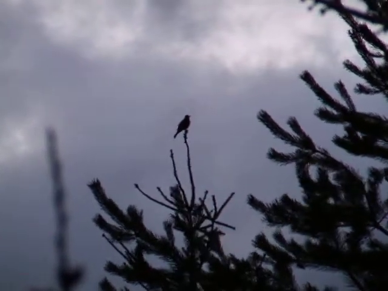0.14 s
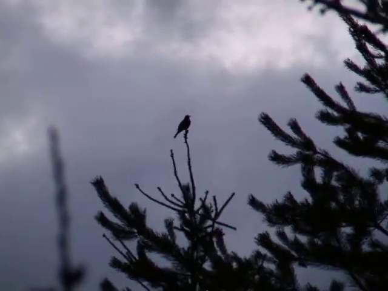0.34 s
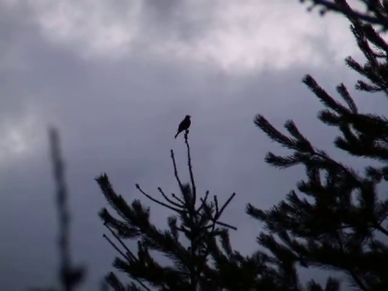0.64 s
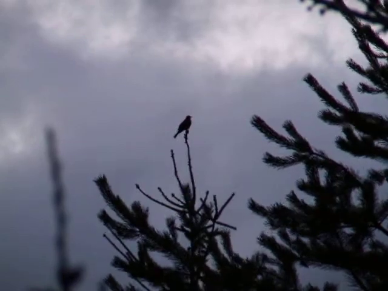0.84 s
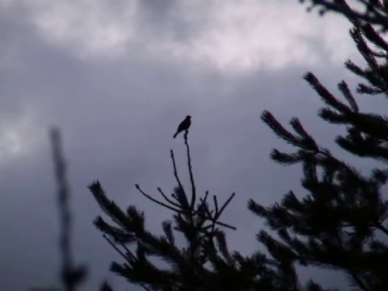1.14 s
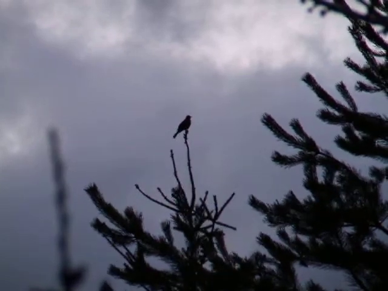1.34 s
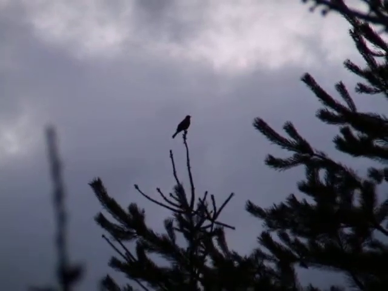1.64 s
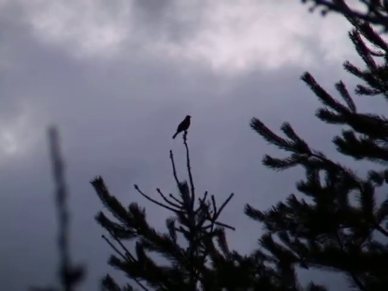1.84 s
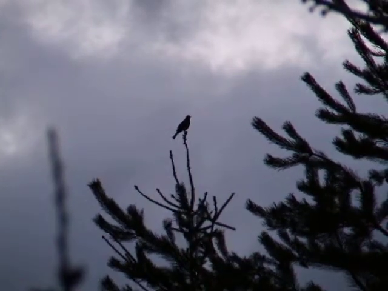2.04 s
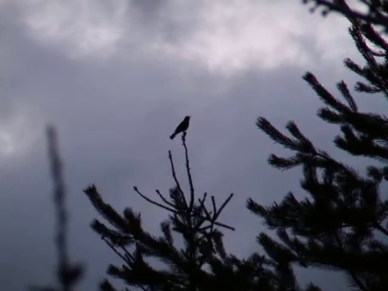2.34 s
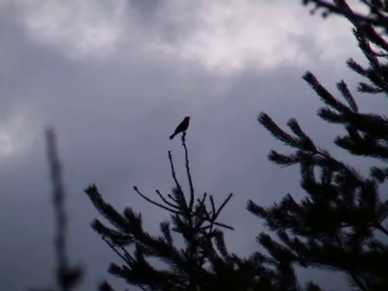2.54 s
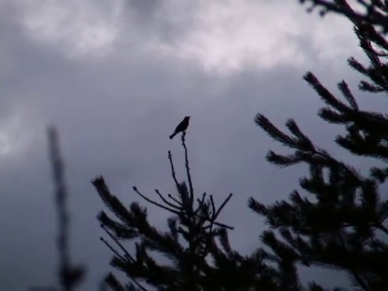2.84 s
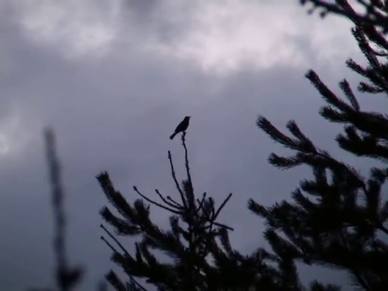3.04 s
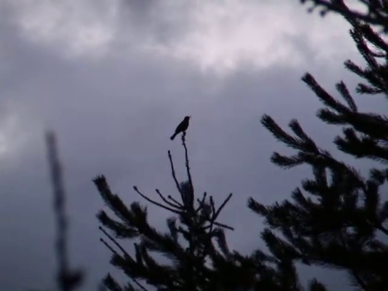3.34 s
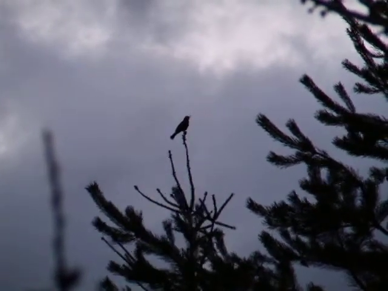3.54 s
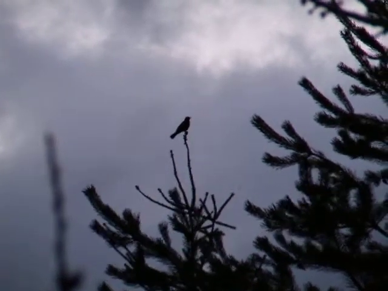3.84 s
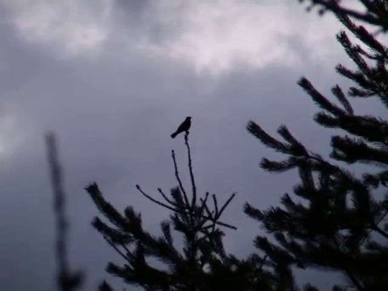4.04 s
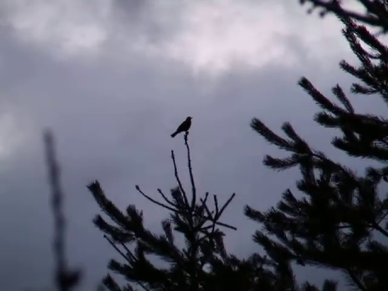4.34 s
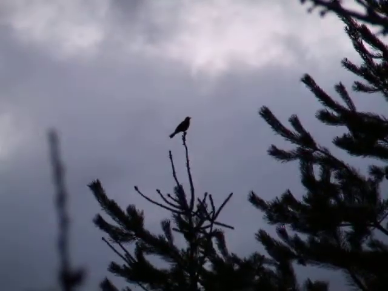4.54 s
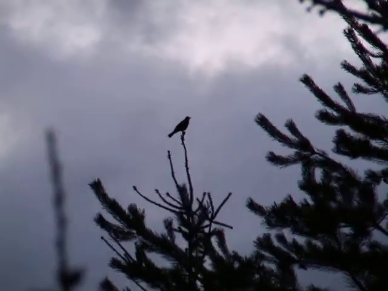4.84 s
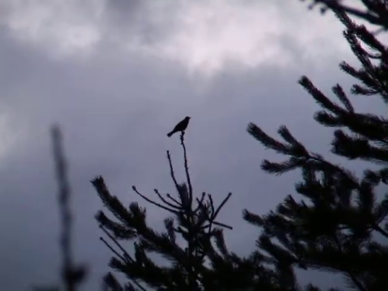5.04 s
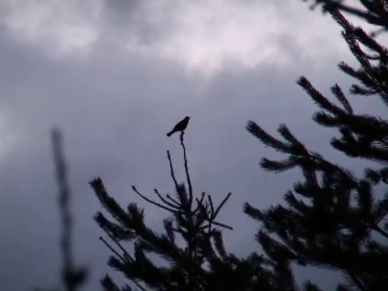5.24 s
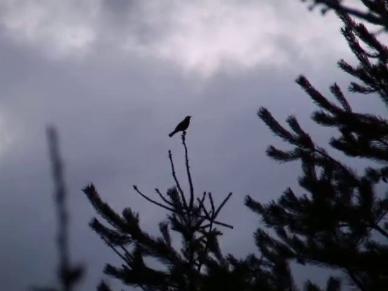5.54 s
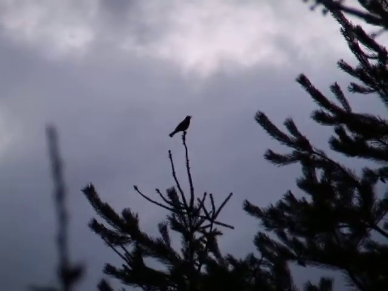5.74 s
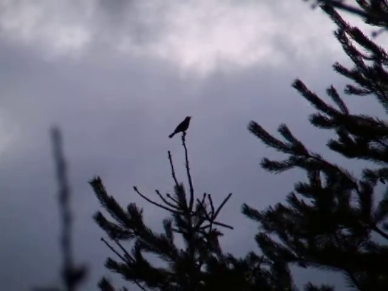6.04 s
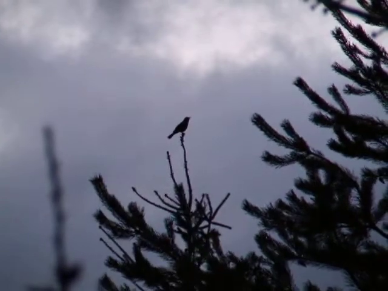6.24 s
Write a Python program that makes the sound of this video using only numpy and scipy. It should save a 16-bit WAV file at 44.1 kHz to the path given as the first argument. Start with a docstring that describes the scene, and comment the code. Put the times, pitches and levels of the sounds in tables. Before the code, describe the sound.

A blackbird sings two short phrases from the top of a conifer, mixing clear whistles with buzzes and rasps, the first trailing off in a quick, high twitter. Before it come a tiny bird's brief whistle and the soft warble of a far blackbird. Between the phrases, low wind buffets the microphone gently and a faint hoot sounds in the distance. The trees add a light echo, over a steady hush with faint microphone hiss and whine.

```python
"""A small bird's thin whistle zigzags over a quiet outdoor hush and a camera's faint hiss and whine.
A far blackbird warbles, then a near one on top of a conifer sings two phrases of flutes, rasps and
buzzes, its syrinx bending and fluttering the notes. The first phrase ends in squeaks and a high twitter
from both sides of the syrinx at once. Trees scatter the song back. Light gusts rumble on the
microphone, and something hoots far off."""
import sys
import numpy as np
from scipy import signal
from scipy.fft import rfft, irfft, next_fast_len
from scipy.io import wavfile
from scipy.ndimage import map_coordinates

SR = 44100
rng = np.random.default_rng(int(sys.argv[2]) if len(sys.argv) > 2 else 0)


def unload_audio(sound):
    """Save the sound as a 16-bit wav file, at the path given as the first command line argument."""
    columns = np.transpose(np.atleast_2d(sound))
    # keep every value between -1 and 1, then stretch to whole-number steps
    steps = np.round(np.clip(columns, -1, 1) * 32767)
    wavfile.write(sys.argv[1], SR, steps.astype(np.int16))


N = 282240


def amp(db):
    """Decibels to gain."""
    return 10 ** (np.asarray(db) / 20)


def unit_rms(x):
    """Scale to rms 1."""
    return x / np.sqrt(np.mean(x ** 2) + 1e-20)


def log_interp(points, hz):
    """(f/Hz, value) points read on a log frequency axis."""
    points_hz, values = np.transpose(points)
    return np.interp(np.log(hz + 1), np.log(points_hz + 1), values)


def wobble(knots_per_s, size):
    """Smooth random curve."""
    knots = rng.standard_normal(int(size * knots_per_s / SR) + 4)
    return map_coordinates(knots, [np.arange(size) * knots_per_s / SR], mode="nearest")


def filtered(x, response):
    """Apply a gain given as a function of Hz."""
    size = next_fast_len(N + SR // 2)
    return irfft(rfft(x, size) * response(np.fft.rfftfreq(size, 1 / SR)), size)[:N]


def noise(spectrum):
    """Coloured noise, rms 1."""
    return unit_rms(filtered(rng.standard_normal(N), lambda hz: amp(log_interp(spectrum, hz))))


def tone(hz):
    """Sine along a pitch curve, rms 1."""
    return np.sqrt(2) * np.sin(2 * np.pi * np.cumsum(hz) / SR)


def bend(start_s, end_s, *pitches_hz):
    """Smooth curve through evenly spaced pitches."""
    progress = np.linspace(0, 1, int(max(end_s - start_s, .005) * SR))
    curve = np.polyfit(np.linspace(0, 1, len(pitches_hz)), np.log(pitches_hz), len(pitches_hz) - 1)
    return np.exp(np.polyval(curve, progress))


def fade(t, edge_s):
    """Soft opening and closing of a note."""
    return np.sin(np.pi / 2 * np.clip(np.minimum(t, t[-1] - t) / edge_s, 0, 1)) ** 2


def add(track, start_s, sound):
    """Mix a sound into the track."""
    part = track[round(start_s * SR):][:len(sound)]
    part += sound[:len(part)]


# Hush and hiss spectrum: f/Hz, relative density/dB
HUSH_SPECTRUM = [(12, -25.5), (20, 7.5), (22, -5), (81, -13.5), (113, -10), (162, -10), (416, -7.5),
                 (497, -9.5), (767, -10), (872, -12), (1130, -13), (2180, -14), (6210, -15), (8020, -16),
                 (8880, -40), (11500, -61), (19500, -120)]


def hush(level_db=-53.5):
    """Steady outdoor hush and camera hiss."""
    return amp(level_db) * noise(HUSH_SPECTRUM)


# Scan tones: f/Hz, level/dB
WHINE_TONES = [(7867, -61.3), (8133, -66)]


def camera_whine(frame_hz=29.97):
    """The camera's scan whine flips polarity at every frame."""
    polarity = np.tanh(8 * np.sin(np.pi * frame_hz * np.arange(N) / SR))
    return polarity * sum(amp(db) * tone(np.full(N, hz)) for hz, db in WHINE_TONES)


def small_bird(start_s=.045, end_s=.26, first_dip_s=.061, zigzag_hz=20, dip_hz=7050, sag_hz_per_s=3400):
    """A very high whistle zigzags downward, loudest at each dip, over a faint lower chatter."""
    t = np.arange(int((end_s - start_s) * SR)) / SR
    since_dip_s = t + start_s - first_dip_s
    zigzag = np.arccos(np.cos(2 * np.pi * zigzag_hz * since_dip_s)) / np.pi
    whistle = tone(dip_hz - sag_hz_per_s * since_dip_s + 1150 * zigzag + 110 * wobble(600, len(t)))
    chatter = amp(-12) * tone(4300 + 300 * wobble(600, len(t)))
    level_db = -49 - 11 * zigzag + 3 * wobble(303, len(t))
    out = np.zeros(N)
    add(out, start_s, amp(level_db) * fade(t, .03) * (whistle + chatter))
    return out


def treetop_echo(x, delay_s=.0051, echo_db=-6):
    """One quick reflection off the tree top doubles short, high notes."""
    out = x.copy()
    add(out, delay_s, amp(echo_db) * x)
    return out


# Decay of the wood's tail: f/Hz, T60/s
WOOD_DECAY = [(500, 0.34), (2000, 1), (3000, 0.67), (7000, 0.71)]


def trees(x, early_db, early_t60_s):
    """Dense early scatter from nearby branches, then a thin tail from the wood."""
    hz, t, spectra = signal.stft(rng.standard_normal(SR), SR, nperseg=256)
    early = amp(early_db - 60 * t / early_t60_s)
    tail = amp(-60 * t / log_interp(WOOD_DECAY, hz)[:, None])
    onset = 1 - np.exp(-t / .0042)
    impulse = signal.istft(spectra * (early + tail) * onset, SR, nperseg=256)[1]
    return signal.fftconvolve(x, impulse / np.linalg.norm(impulse))[:N]


def syrinx(hz, swell_db, overtone_db, edge_s, jitter, shimmer_db, depth=0, flutter_hz=0, third_db=-5.5):
    """One note: air pressure arches and trembles; a fast flutter bends and pulses it into a buzz."""
    t = np.arange(len(hz)) / SR
    progress = t / t[-1]
    flutter = np.sin(2 * np.pi * np.cumsum(flutter_hz * (1 + .17 * wobble(60.7, len(t)))) / SR)
    swing_hz = .57 * depth
    hz = hz * (1 + jitter * wobble(250, len(t))) + swing_hz * flutter
    arch_db = np.sin(np.pi * progress) - .5
    pressure_db = swell_db * (progress - .5) + arch_db + shimmer_db * wobble(120, len(t))
    pulsing = 1 + np.tanh(depth / 350) * flutter
    third = amp(third_db) * tone(3 * hz) * (3 * hz < SR / 2)
    overtones = (tone(2 * hz) + third) * amp(overtone_db + 4.35 * wobble(70, len(t)))
    return amp(pressure_db) * pulsing * fade(t, edge_s) * (tone(hz) + overtones)


# Far warble: start t/s, end t/s, first f/Hz, last f/Hz, level/dB, swell/dB, flutter depth
WARBLE_NOTES = [(0.688, 0.816, 2267, 2180, -58.5, -4, 70), (0.869, 0.992, 2142, 2032, -58.5, -12, 71),
                (1.037, 1.13, 2340, 2250, -63, 1, 130), (1.05, 1.125, 2960, 3010, -64, 0, -1),
                (1.20, 1.29, 2084, 2143, -58, -7, 32), (1.27, 1.649, 2900, 2858, -54.5, -13.5, 0),
                (1.92, 2.07, 1945, 2150, -56, 19, 60.5), (2.03, 2.19, 2207, 2175, -55, 0.5, 76)]


def far_blackbird():
    """Soft gliding notes, most with a light flutter of the syrinx."""
    out = np.zeros(N)
    for start_s, end_s, first_hz, last_hz, db, swell_db, depth in WARBLE_NOTES:
        hz = bend(start_s, end_s, first_hz, last_hz)
        note = syrinx(hz, swell_db, overtone_db=-39, edge_s=.31 * (end_s - start_s),
                      jitter=.0025, shimmer_db=1.8, depth=depth, flutter_hz=76)
        add(out, start_s, amp(db) * note)
    return out


# Fluted notes: start t/s, end t/s, first f/Hz, middle f/Hz, last f/Hz, level/dB, swell/dB, overtones/dB
FLUTE_NOTES = [ (2.180, 2.243, 1870, 1946, 1913, -35, 18.5, -34),
               (2.24, 2.309, 1737, 1642, 1620, -48.5, -1.5, -33.5),
               (2.340, 2.43, 1861, 1816, 1704, -43, -9, -22),
               (2.474, 2.548, 2480, 2665, 2738, -38, -7, -21.5),
               (2.486, 2.527, 3240, 3540, 3430, -39.5, -2, -23.5),
               (2.518, 2.63, 1848, 1772, 1725, -39.5, 11, -20.5),
               (2.948, 2.984, 2786, 2937, 2860, -30.5, 11.5, -31),
               (2.976, 3.052, 2285, 2244, 2218, -38, 11.5, -8.5),
               (5.414, 5.491, 2468, 2452, 2545, -43.5, 0, -17.5),
               (5.461, 5.586, 1600, 1714, 1687, -46, 17, -18),
               (5.606, 5.629, 1984, 1988, 1960, -31, -1.5, -36.5),
               (5.753, 5.787, 2332, 2457, 2565, -30.5, -13, -31.5),
               (5.782, 5.81, 2493, 2412, 2180, -25, -5, -37),
               (5.887, 6.011, 2228, 2123, 2050, -39, -3, -21.5),
               (5.933, 6.009, 2865, 3300, 3070, -40.5, 12, -30),
               (5.999, 6.179, 2995, 2946, 2828, -28.5, -5.5, -33.5),
               (6.168, 6.255, 2854, 2800, 2815, -36, 1, -46)]


def flutes():
    """Clean whistles; where two overlap, both sides of the syrinx sing at once."""
    out = np.zeros(N)
    for start_s, end_s, first_hz, middle_hz, last_hz, db, swell_db, overtone_db in FLUTE_NOTES:
        hz = bend(start_s, end_s, first_hz, middle_hz, last_hz)
        jitter = .003 + .025 * amp(overtone_db)  # reedier notes are less steady
        note = syrinx(hz, swell_db, overtone_db, edge_s=.009, jitter=jitter, shimmer_db=.6)
        add(out, start_s, amp(db) * note)
    return out


# Throat response: f/Hz, gain/dB
THROAT_RESPONSE = [(1000, -5), (2000, 1), (3000, -4), (3700, -5.5), (4500, 0), (5600, -3.5), (6600, 1),
                   (7400, -1.5), (8600, -13)]


def throat(x):
    """The near blackbird's throat colours its notes."""
    return filtered(x, lambda hz: amp(log_interp(THROAT_RESPONSE, hz)))


# Steep falls: start t/s, end t/s, first f/Hz, last f/Hz, level/dB
RASP_NOTES = [(2.266, 2.285, 3080, 1796, -44), (2.292, 2.315, 2790, 1826, -42.5),
              (2.321, 2.346, 2230, 1763, -42), (3.043, 3.072, 4706, 2535, -37.5),
              (3.044, 3.14, 2000, 1054, -55), (3.354, 3.385, 2663, 2182, -47),
              (3.552, 3.565, 2720, 1890, -54), (3.779, 3.796, 2410, 1890, -57),
              (4.048, 4.060, 4350, 3690, -49), (4.056, 4.07, 2250, 1750, -56),
              (6.274, 6.335, 3650, 1930, -33.5)]


def rasps():
    """The pitch drops fast and settles while the syrinx rattles."""
    out = np.zeros(N)
    for start_s, end_s, first_hz, last_hz, db in RASP_NOTES:
        length_s = end_s - start_s
        tension = np.exp(-3.2 * np.linspace(0, 1, int(length_s * SR)))
        hz = last_hz + (first_hz - last_hz) * (tension - tension[-1]) / (1 - tension[-1])
        note = syrinx(hz, swell_db=-.5, overtone_db=-28, edge_s=.15 * length_s,
                      jitter=.03, shimmer_db=2, depth=269, flutter_hz=260)
        add(out, start_s, amp(db) * note)
    return out


# Buzzes and closing echo: start t/s, end t/s, f/Hz, sag/Hz, level/dB, swell/dB, flutter rate/Hz
BUZZES_AND_ECHO = [(2.630, 2.757, 2183, -1, -33, 7, 131.4), (2.748, 2.842, 2097, 88.5, -34.5, 0, 118),
                   (2.971, 3.004, 3035, -60, -43, -13, 200), (3.058, 3.106, 2500, 99, -39, -8, 172),
                   (3.094, 3.143, 2332, 339, -38, -8, 162), (5.569, 5.613, 1850, -170, -41, 3, 135),
                   (5.622, 5.706, 2025, -58, -38.5, 0.5, 81.7),
                   (6.325, 6.407, 1870, 120.5, -40, -11, 130.6)]


def buzzes():
    """Fluttering buzzes; the last is the closing downslur's echo, ringing on and fading in the trees."""
    out = np.zeros(N)
    for start_s, end_s, centre_hz, sag_hz, db, swell_db, flutter_hz in BUZZES_AND_ECHO:
        hz = bend(start_s, end_s, centre_hz + sag_hz / 2, centre_hz - sag_hz / 2)
        buzz = syrinx(hz, swell_db, overtone_db=-29.5, edge_s=.0081,
                      jitter=.006, shimmer_db=1.1, depth=182, flutter_hz=flutter_hz, third_db=1)
        add(out, start_s, amp(db) * buzz)
    return out


# Squeaks: start t/s, end t/s, first f/Hz, middle f/Hz, last f/Hz, level/dB, swell/dB, overtones/dB
SQUEAK_NOTES = [(3.269, 3.279, 7850, 7120, 6400, -43, -1, -38),
                (3.280, 3.293, 7430, 7040, 6400, -45, -1.5, -40),
                (3.327, 3.342, 2830, 3130, 4340, -43.5, 7, -16),
                (3.336, 3.361, 4290, 5140, 3800, -40, 0, -14.5)]


def squeaks():
    """Abrupt, unsteady high notes open the twitter."""
    out = np.zeros(N)
    for start_s, end_s, first_hz, middle_hz, last_hz, db, swell_db, overtone_db in SQUEAK_NOTES:
        hz = bend(start_s, end_s, first_hz, middle_hz, last_hz)
        note = syrinx(hz, swell_db, overtone_db, edge_s=.0017,
                      jitter=.04, shimmer_db=3, depth=400, flutter_hz=297)
        add(out, start_s, amp(db) * note)
    return out


# Two-voiced syllables: start t/s, length/s, level/dB
TWITTER_SYLLABLES = [(3.283, .053, -42), (3.419, 0.052, -42.5), (3.474, .036, -43.5), (3.525, .036, -46),
                     (3.571, .042, -47), (3.624, .037, -48), (3.69, .04, -47.5), (3.741, .038, -47.5),
                     (3.792, .04, -47.5)]


def twitter(foot_hz=3800, low_crown_hz=6580, high_crown_hz=7510, effort_hz_per_db=48, sideband_hz=1150):
    """Each side of the syrinx sweeps a rough arch; the upper voice fades in around the crown."""
    out = np.zeros(N)
    mean_db = np.mean([db for _, _, db in TWITTER_SYLLABLES])
    for start_s, length_s, db in TWITTER_SYLLABLES:
        t = np.arange(int(length_s * SR)) / SR
        flank = np.abs(2 * t / t[-1] - 1)
        drop = np.sin(np.pi / 2 * flank ** 2.5) ** 1.5  # flat crown, steep flanks
        rough_hz = (50 + 260 * drop) * wobble(900, len(t))
        low_hz = low_crown_hz - (low_crown_hz - foot_hz) * drop + rough_hz
        effort_hz = effort_hz_per_db * (db - mean_db)
        high_hz = high_crown_hz + effort_hz - 1000 * flank ** 2 + 40 * wobble(420, len(t))
        upper = amp(-4) * fade(t, .011) * (tone(high_hz) + amp(-8) * tone(high_hz + sideband_hz))
        level_db = db - 3 * flank + 2 * wobble(450, len(t))
        add(out, start_s, amp(level_db) * fade(t, .0022) * (tone(low_hz) + upper))
    return out


# Gusts: start t/s, hold/s, level/dB
WIND_GUSTS = [(3.302, .008, -49), (3.773, 0.18, -43.5), (4.014, 0.12, -43), (4.49, 0.2, -50),
              (4.716, 0.14, -41.5), (4.929, 0.089, -34.5), (5.2, 0.14, -39.5), (5.327, 0.11, -36),
              (5.524, .1, -39.5), (5.658, 0.041, -47)]
# Eddy spectrum: f/Hz, relative density/dB
EDDY_SPECTRUM = [(15, -8), (25, 6.5), (45, 1.5), (65, 2.5), (95, -2), (130, -10.5), (180, -16), (260, -24),
                 (450, -32), (900, -62)]


def wind(breeze_db=-60, breeze_peak_s=4.7, breeze_width_s=1, rise_db_per_s=329, fall_db_per_s=400.5):
    """Gusts rise, hold and fall over a slow breeze, and break into low eddies on the microphone."""
    t = np.arange(N) / SR
    level = amp(breeze_db) * np.exp(-((t - breeze_peak_s) / breeze_width_s) ** 2 / 2)
    for start_s, hold_s, db in WIND_GUSTS:
        ramp_db = np.minimum(rise_db_per_s * (t - start_s), fall_db_per_s * (start_s + hold_s - t))
        level = np.maximum(level, amp(db + np.minimum(ramp_db, 0)))
    eddies = noise(EDDY_SPECTRUM) * amp(3 * wobble(35, N))
    return level * unit_rms(eddies)


# Far hoots: start t/s, f/Hz, level/dB
HOOT_NOTES = [(4.642, 722, -52.5), (4.67, 439.4, -54.5), (6.30, 436, -60)]


def hoots(length_s=.08):
    """Short, low, fading notes from far off."""
    out = np.zeros(N)
    for start_s, pitch_hz, db in HOOT_NOTES:
        hz = bend(start_s, start_s + length_s, pitch_hz, pitch_hz)
        note = syrinx(hz, swell_db=-8.5, overtone_db=-13, edge_s=.01, jitter=.021, shimmer_db=2)
        add(out, start_s, amp(db) * note)
    return out


def scene():
    """The near bird is mostly direct; the far ones are mostly echo."""
    song = throat(flutes() + buzzes() + rasps())
    high = treetop_echo(throat(twitter() + squeaks()) + small_bird())
    far = far_blackbird() + hoots()
    song = song + amp(-5.5) * trees(song, early_db=9.5, early_t60_s=.11)
    high = high + amp(-6) * trees(high, early_db=3, early_t60_s=.22)
    far = amp(-3.5) * far + amp(-1.5) * trees(far, early_db=-4.5, early_t60_s=.16)
    return (song + high + far + wind() + hush() + camera_whine())[None]


def record(dry, knee_hz=8250, top_hz=9040, drop_db=32, dc_offset=-.0024):
    """The camera's narrow band rolls off steeply; its converter sits slightly off zero."""
    def rolloff(hz):
        past_knee = np.clip((hz - knee_hz) / (top_hz - knee_hz), 0, 1)
        return amp(-drop_db * past_knee ** 5.2) * (hz < top_hz)
    return filtered(dry[0], rolloff)[None] + dc_offset


dry = scene()
out = record(dry)
unload_audio(out)
```